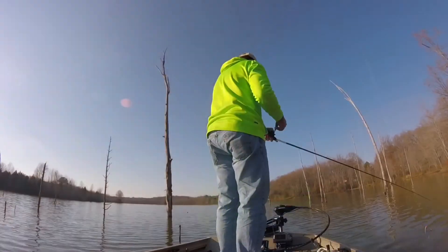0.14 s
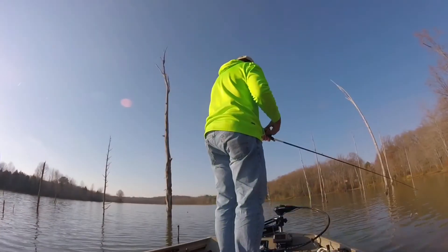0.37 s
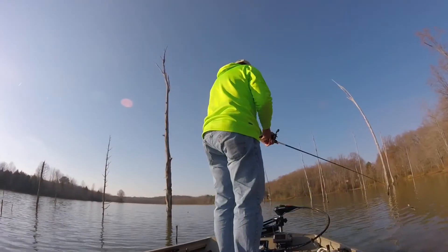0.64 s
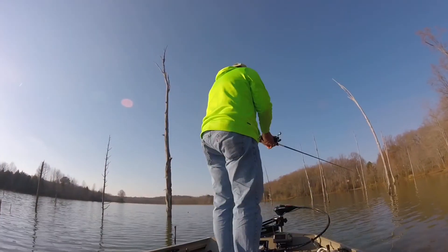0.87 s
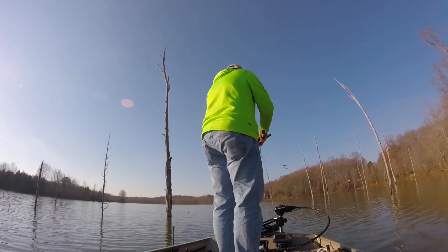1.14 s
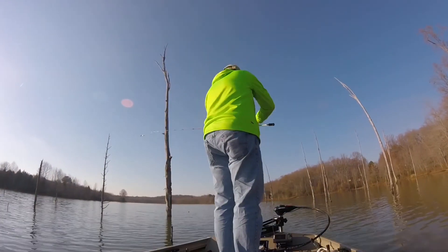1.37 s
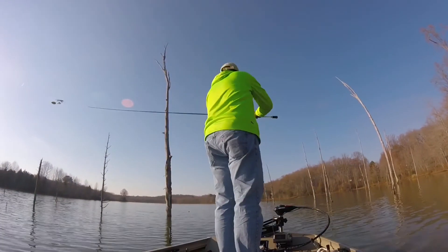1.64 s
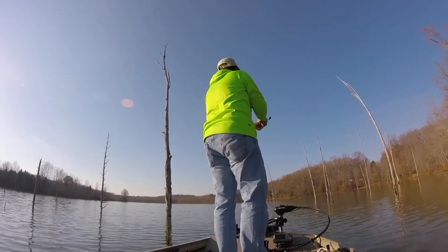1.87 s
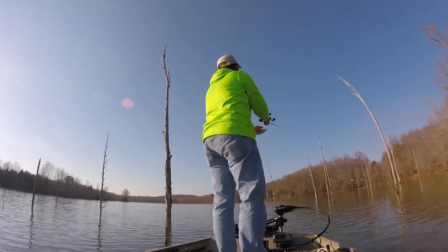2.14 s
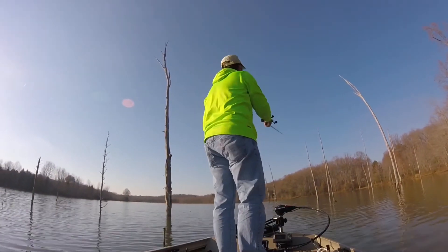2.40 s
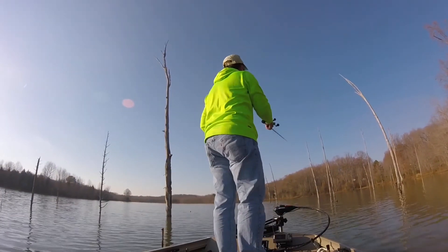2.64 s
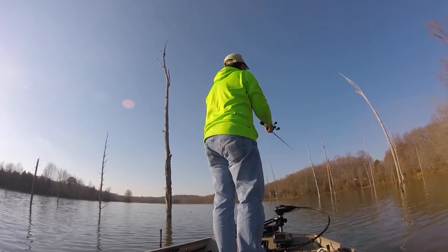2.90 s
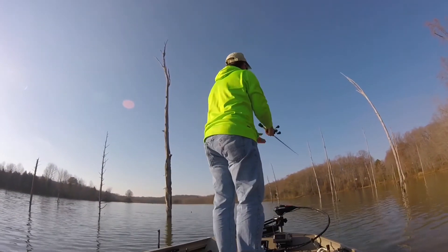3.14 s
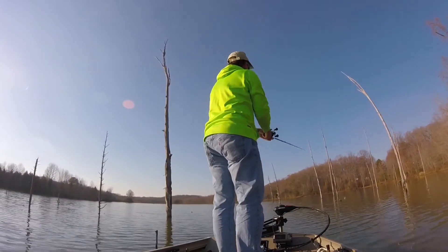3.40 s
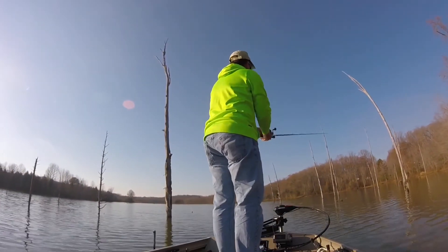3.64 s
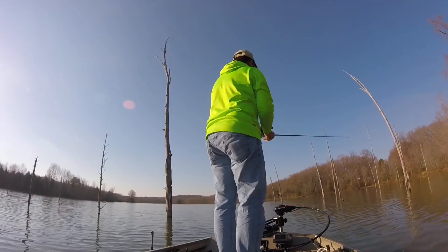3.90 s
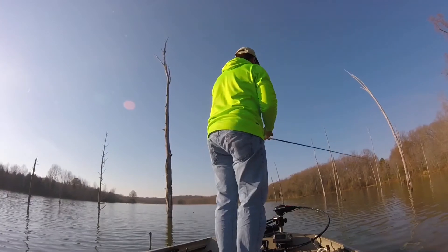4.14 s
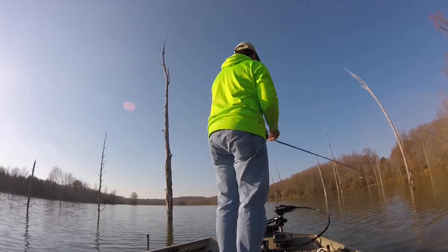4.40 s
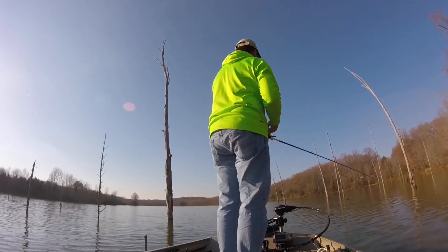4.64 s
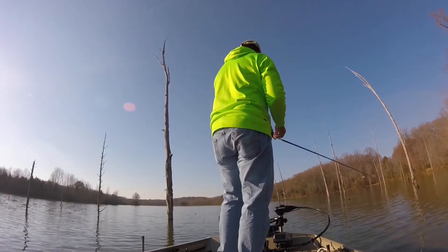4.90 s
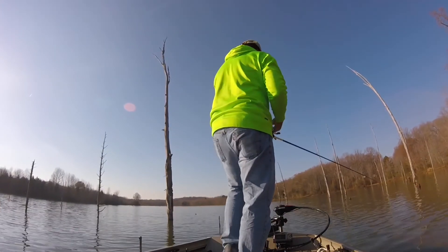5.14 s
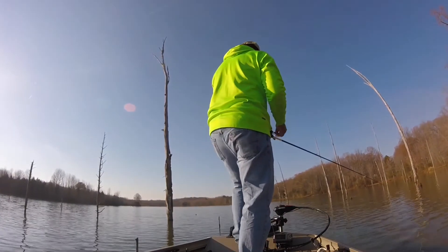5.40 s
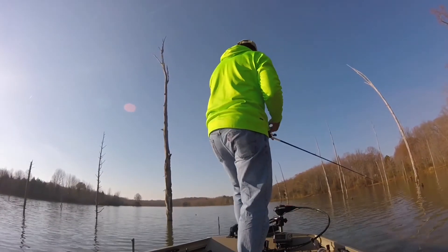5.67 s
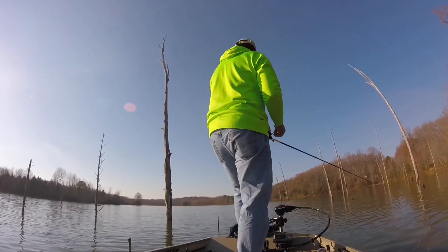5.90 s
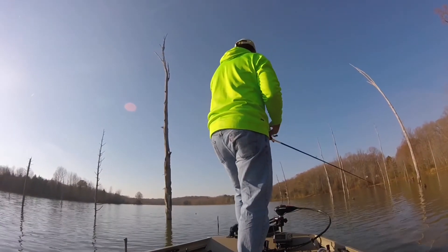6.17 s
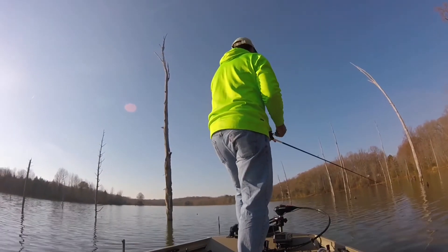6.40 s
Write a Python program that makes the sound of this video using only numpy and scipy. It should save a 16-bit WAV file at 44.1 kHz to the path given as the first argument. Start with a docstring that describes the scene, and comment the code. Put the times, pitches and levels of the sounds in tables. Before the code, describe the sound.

Low wavering engine drone and dull outdoor hush, broken by a loud hollow boat knock, a brief airy cast, tiny metallic tinkles, a sharp reel snap and scuffing feet.

```python
"""A calm lake, heard from a small boat where an angler works a rod: gear and feet knock and scuff on the hull,
the reel clicks, lure hooks jingle and the rod swishes. Rough contacts ring modes of hull, reel and hooks;
the swish is shaped noise. Behind them a far engine of three wavering harmonics changes speed, with thin tones,
low gusts and an early wash over a dull outdoor hush of banded noise."""
import sys
import numpy as np
from scipy import signal
from scipy.io import wavfile
from scipy.ndimage import uniform_filter1d

SR = 44100
rng = np.random.default_rng(int(sys.argv[2]) if len(sys.argv) > 2 else 0)


def file_out(sig):
    """Save sig as 16-bit WAV at sys.argv[1]."""
    # one column per channel
    cols = np.atleast_2d(sig).T
    # limit, then scale
    lim = np.clip(cols, -1, 1)
    pcm = np.round(lim * 32767).astype(np.int16)
    wavfile.write(sys.argv[1], SR, pcm)


def amplitude_ratio(level_db):
    """Convert a level in decibels to the matching linear amplitude (field) ratio."""
    exponent = np.asarray(level_db, float) / 20
    return 10 ** exponent


N = 288185

# modes of the hull ringing free: f/Hz, level/dB, t60/s
HULL_MODES = [(90, 0, .14), (150, 0, .1), (215, 0, .085), (260, -3, .08), (305, 0, .09), (355, -2, .08),
              (409, -1.5, .09), (465, -1.5, .08), (522, 0, .09), (590, -1.5, .08), (646, 0, .1),
              (748, 0, .075), (861, -1.5, .06), (964, -3, .06), (1050, -1.5, .06), (1150, -3, .045),
              (1350, -4, .045), (1800, -8, .025), (2230, -3, .035), (2600, -3, .03), (3000, -3, .025),
              (3400, -3, .025)]
HULL_DAMPING_DB_PER_S = 750   # what strikes the hull rests on it and damps the ring


def rms_one(x):
    """Scale to rms 1."""
    return x / np.sqrt(np.mean(x ** 2) + 1e-20)


def in_time(rows):
    """Table columns after the time as curves, one value a sample."""
    s, *columns = np.transpose(rows)
    return [np.interp(np.arange(N) / SR, s, c) for c in columns]


def swell(s, db, rise_db_per_s, fall_db_per_s, hold_s=0):
    """A level in dB that climbs to its peak at s, holds and sinks."""
    t = np.arange(N) / SR - s
    return db + np.minimum(0, np.minimum(rise_db_per_s * t, fall_db_per_s * (hold_s - t)))


def drift(rate_hz):
    """Slow chance: noise at every 40th sample through a double one-pole low-pass; spread 1."""
    r = np.exp(-80 * np.pi * rate_hz / SR)
    white = rng.standard_normal(N // 40 + 2002)
    slow = signal.lfilter([1], [1, -2 * r, r * r], white)[2000:]
    return np.interp(np.arange(N) / 40, np.arange(len(slow)), rms_one(slow - slow.mean()))


def bandpass(x, low_hz, high_hz):
    """Second-order band-pass design with no ripple."""
    return signal.sosfilt(signal.butter(2, [low_hz, high_hz], "band", fs=SR, output="sos"), x)


def banded_noise(spectrum, patchy_db):
    """Third-octave bands of noise, each with its own level and flicker; rms 1."""
    out, edges = 0, 12 * 2 ** (np.arange(32) / 3)
    white = rng.standard_normal((2, N + SR))      # neighbouring bands get unrelated noise
    hz_points, db_points = np.transpose(spectrum)
    for k, (low, high) in enumerate(zip(edges, edges[1:])):
        band = bandpass(white[k % 2], low, high)[SR:]   # the first second lets the filter settle
        level_db = np.interp(np.log(low * high) / 2, np.log(hz_points), db_points)
        out = out + band * amplitude_ratio(level_db + patchy_db * drift(21.0))
    return rms_one(out)


def tone(hz, level_db):
    """A sine that follows a pitch curve, at an rms level."""
    return np.sqrt(2) * amplitude_ratio(level_db) * np.sin(2 * np.pi * (np.cumsum(hz) / SR + rng.random()))


def ring(clicks, hz, t60):
    """A two-pole resonator: a unit click sets off a dying sine that starts from height 1."""
    r, w = amplitude_ratio(-60 / (max(t60, .002) * SR)), 2 * np.pi * hz / SR
    return signal.lfilter([0, np.sin(w)], [1, -2 * r * np.cos(w), r * r], clicks + 1e-18)


def contact(length_s, first):
    """A first touch, then a chatter of tiny contacts that swells, dies and settles."""
    t = np.arange(SR // 4) / SR / max(length_s, 1e-4)
    chatter = rng.standard_normal(len(t)) * (t * np.exp(-t) + 0.16 * np.exp(-t / 9))
    chatter[0] = first
    return chatter


def blow(touch, hz, t60):
    """One mode rings with the part of the contact near its pitch; peak 1."""
    near = bandpass(touch, hz / 1.5, min(hz * 1.5, .45 * SR))
    rung = ring(near, hz, t60)
    return rung / np.abs(rung).max()


def add(out, sound, s):
    """Mix a short sound in at its time."""
    i = int(s * SR)
    out[i:i + len(sound)] += sound[:N - i]


def damped_t60(t60):
    """Decay rates add: a mode under a resting load dies sooner than a free one."""
    return 1 / (1 / t60 + HULL_DAMPING_DB_PER_S / 60)


def knocks():
    """A knock is a soft-edged thud of the struck spot, then the hull modes near its pitch, the low ones later."""
    # knocks on the hull: t/s, thud peak level/dB, loudest f/Hz, spread/octaves, contact time/s
    knock_rows = [(0.132, -41.5, 1150, 0.4, 0.0014), (0.9885, -30, 930, 0.37, 0.00047),
                  (1.131, -43, 980, 0.28, 0.0028), (1.2813, -17.5, 458, 0.58, 0.00021),
                  (1.283, -27, 297, 0.61, 0.00046), (1.2835, -28, 182, 0.74, 0.00042),
                  (1.284, -35.5, 1110, 0.27, 0.0016), (1.303, -31, 530, 0.61, 0.0015),
                  (1.312, -42, 417, 0.7, 0.0025), (1.33, -46, 382, 0.66, 0.003),
                  (1.679, -43, 965, 0.19, 0.0021), (1.683, -39.5, 712, 0.47, 0.0019),
                  (1.6925, -31.5, 732, 0.18, 0.00095), (1.703, -38, 790, 0.34, 0.0014),
                  (1.713, -39, 702, 0.3, 0.0015), (2.528, -39.5, 850, 1, 0.0022),
                  (3.177, -43, 1068, 0.13, 0.0014), (3.179, -45, 598, 0.32, 0.0011),
                  (3.188, -37.5, 1024, 0.08, 0.0021), (3.215, -49, 980, .15, 0.0028),
                  (3.425, -52, 2550, 0.08, 0.0018), (3.431, -48.5, 2230, 0.08, 0.0013),
                  (3.423, -45, 780, 0.38, 0.0016), (3.4369, -30, 737, 0.5, 0.00027),
                  (3.443, -35, 690, 0.14, 0.00081), (3.451, -47, 238, .25, 0.0029),
                  (3.451, -35.5, 684, 0.083, 0.0013), (3.457, -47, 660, 0.44, 0.00046),
                  (3.7475, -39.5, 820, 0.35, 0.0017), (3.754, -36.5, 735.5, 0.19, 0.0015),
                  (3.761, -43, 697, 0.16, 0.0016), (3.774, -51, 644, 0.5, 0.0016),
                  (4.215, -35, 55.2, 0.7, 0.006), (4.1238, -39, 850, 0.27, 0.0016),
                  (5.691, -34, 880, 0.45, 0.00065), (5.693, -53, 2560, 0.083, 0.0032),
                  (5.69, -32, 69.2, 0.54, 0.0035), (5.707, -39.5, 170, 0.55, 0.0033),
                  (5.73, -40, 139, 0.5, 0.0025), (5.751, -46, 403, 0.44, 0.00085),
                  (5.757, -33, 490, 0.47, 0.00092), (5.957, -40.5, 809, 0.45, 0.0022),
                  (6.043, -55, 2990, 0.43, 0.0027), (6.078, -31.5, 910, 0.051, 0.0052),
                  (6.095, -29.5, 583, 0.33, 0.0006), (6.117, -29, 612, 0.3, 0.0004),
                  (6.128, -36, 599, .2, 0.0022), (6.143, -38, 560, .3, .0015),
                  (6.153, -36.5, 756, 0.18, 0.0026), (6.178, -33, 790, 0.22, 0.0026),
                  (6.222, -39.5, 770, 0.29, 0.0034)]
    sharp_touch_s = 0.0073   # the briefer the contact, the harder its first touch
    thud_cycles, soft_edge_cycles = 9.5, 2.6   # t60 in cycles; a narrow thud dies more slowly
    lag_cycles, hull_ring_db = 0.56, -5.5   # ring level against the thud
    out = np.zeros(N)
    for s, db, top_hz, spread, contact_s in knock_rows:
        touch = contact(contact_s, first=sharp_touch_s / contact_s)
        thud_t60 = thud_cycles / top_hz / np.sqrt(spread)
        thud = ring(blow(touch, top_hz, thud_t60), top_hz, soft_edge_cycles / top_hz)
        add(out, amplitude_ratio(db) * thud / np.abs(thud).max(), s)
        for hz, level_db, t60 in HULL_MODES:
            share_db = -6 * (np.log2(hz / top_hz) / spread) ** 2
            lag_s = lag_cycles * max(1 / hz - 1 / top_hz, 0)
            strength_db = db + hull_ring_db + level_db + share_db
            add(out, amplitude_ratio(strength_db) * blow(touch, hz, damped_t60(t60)), s + lag_s)
    return out


def scuff():
    """Soles and gear drag over the deck: dense uneven grit into the hull modes near where they rub."""
    # rubs on the deck: t/s, relative level/dB, drag/s, loudest f/Hz, spread/octaves
    rubs = [(1.305, -61, 0.019, 430, 0.71), (5.7, -56, 0.02, 435, 1), (5.995, -50.5, 0.086, 760, 0.3),
            (6.08, -49, 0.092, 264, 0.5), (6.16, -55.5, 0.026, 2200, 0.82), (6.095, -48, 0.04, 350, 0.23),
            (6.105, -42, 0.023, 590, 0.093), (6.15, -46, 0.062, 837, 0.23),
            (6.145, -51, 0.047, 1350, 0.088), (5.7, -57, 0.1, 390, 0.49)]
    press_db_per_s, lift_db_per_s = 298, 353
    grit_per_s, scuff_db = 1500, -3   # grains for each mode; overall trim
    pressing = [amplitude_ratio(swell(s, db, press_db_per_s, lift_db_per_s, drag_s)) for s, db, drag_s, _, _ in rubs]
    out = 0
    for hz, level_db, t60 in HULL_MODES:
        grit = (rng.random(N) < grit_per_s / SR) * rng.standard_normal(N)
        reach = 0
        for pressure, (_, _, _, top_hz, spread) in zip(pressing, rubs):
            reach = reach + pressure * amplitude_ratio(-6 * (np.log2(hz / top_hz) / spread) ** 2)
        out = out + ring(grit * reach * amplitude_ratio(level_db), hz, damped_t60(t60))
    soft = signal.butter(2, 1800, fs=SR, output="sos")   # rubber has no sharp edge
    return signal.sosfilt(soft, amplitude_ratio(scuff_db) * out)


def reel():
    """Pawl and bail snaps in a stiff plastic and metal body; the tilt makes one brighter or duller."""
    # modes of the reel body: f/Hz, level/dB, t60/s
    body_modes = [(850, -20, 0.0066), (1220, -8, 0.0034), (1570, -15, 0.0035), (1860, -1, 0.0078),
                  (2380, -9.5, 0.0041), (2850, -4.5, 0.0058), (3330, -8, 0.0095), (3970, -2.5, 0.012),
                  (4560, 1.5, 0.0044), (5700, 0.5, 0.0036), (6330, 6.5, 0.0046), (7230, -16, 0.015),
                  (8040, -9, 0.0034), (9200, -44, 0.019), (10360, -19.5, 0.0036), (12800, -31, 0.0051),
                  (13300, -16, 0.0045)]
    # clicks: t/s, level/dB, tilt/dB per octave, contact time/s, share of the body's colour/0-1
    click_rows = [(0.014, -52, -6, 0.00097, 0.5), (0.133, -53, -6.5, 0.00035, 0.3),
                  (0.9872, -43, 0.5, 0.00089, 0.44), (3.414, -51.5, 0, 0.00036, 0.74),
                  (4.096, -66, 4, 0.00077, 0.91), (4.1175, -53, 3, 0.0005, 0.5),
                  (4.1205, -29, 2.5, 0.00049, 0.94), (4.1255, -44.5, -3, 0.0008, 0.38),
                  (4.1285, -49, -3, 0.0005, 0.7), (4.135, -58, -2, 0.00092, 0.7),
                  (5.962, -60.5, 1, 0.00082, 0.3)]
    out = np.zeros(N)
    for s, db, tilt_db, contact_s, colour in click_rows:
        touch = contact(contact_s, first=0.39)
        for m, (hz, level_db, t60) in enumerate(body_modes):
            strength_db = db + colour * level_db + tilt_db * np.log2(hz / 4000)
            add(out, (-1) ** m * amplitude_ratio(strength_db) * blow(touch, hz, t60), s)   # modes alternate in sign
    return out


def lure():
    """Small steel hooks and rings of the lure tinkle: each touch rings a few high modes."""
    # modes of the hooks: ratio to the lowest, level/dB, t60/s
    hook_modes = [(1, 0, .055), (1.11, -6, .025), (1.455, -10, .06), (1.94, -9, .05), (2.41, -8, .06)]
    # jingles: t/s, level of the lowest mode before scatter/dB, lowest f/Hz, tilt/dB per octave
    jingle_rows = [(1.915, -72, 6030, 7), (1.936, -74, 6030, 10), (1.951, -57, 6030, -3),
                   (1.962, -60, 6030, -3), (1.98, -68, 6030, 4), (2.006, -57, 6050, 1),
                   (2.06, -72, 6080, 5), (2.085, -65, 6060, 7), (2.111, -69, 6090, 8),
                   (2.151, -76, 6140, 12), (2.257, -62, 6120, 3), (2.268, -62, 6120, -8),
                   (2.425, -48, 6207, -17), (2.444, -51, 6207, -17), (2.594, -72, 6250, 11)]
    scatter_db = 2   # no two touches strike the modes alike
    out = np.zeros(N)
    for s, db, hz, tilt_db in jingle_rows:
        touch = contact(0.0012, first=0.31)
        for ratio, level_db, t60 in hook_modes:
            strength_db = db + level_db + tilt_db * np.log2(ratio) + rng.normal(0, scatter_db)
            add(out, amplitude_ratio(strength_db) * blow(touch, hz * ratio, t60), s)
    return out


def swish():
    """Bright air noise of the cast: the rod cuts the air in a flash, the line swells and fades more slowly."""
    # colour of the swish: f/Hz, level/dB per Hz
    air_colour = [(800, 9.5), (1500, -3.5), (3000, -3), (4500, -7), (6500, -1.5), (8000, -14), (11000, -21),
                  (14500, -21), (15500, -30)]
    peak_s = 1.778
    rod = amplitude_ratio(swell(peak_s, -50, rise_db_per_s=390, fall_db_per_s=510))
    line = amplitude_ratio(swell(peak_s, -56.5, rise_db_per_s=140, fall_db_per_s=64))
    return (rod + line) * banded_noise(air_colour, patchy_db=2.2)


def engine():
    """At this distance only the lowest harmonics of the firing rate are left; the air makes them waver."""
    # far engine before its waver: t/s, firing f/Hz, level/dB of harmonics 1, 2 and 3
    speeds = [(0.0, 43.5, -42, -52, -60), (0.18, 42.57, -56, -51.5, -55.5), (0.38, 43.96, -39, -47.5, -62),
              (0.45, 43.4, -64, -39.5, -53.5), (0.63, 41.02, -40.5, -59, -74),
              (0.73, 37.77, -43, -43, -53.5), (0.89, 39.45, -64, -42.5, -64), (1.03, 33.8, -50, -53, -59),
              (1.2, 35, -61, -40, -51), (1.49, 39.2, -46, -49, -64), (1.96, 39.73, -41.5, -48.5, -58),
              (2.35, 36.4, -50, -41.5, -54), (2.51, 32.53, -61, -61, -54), (2.65, 29.97, -42, -58, -72),
              (2.9, 31.36, -62, -57, -61), (3.03, 33.5, -53, -51, -56), (3.14, 33.8, -44, -50.5, -49),
              (3.4, 33.9, -46.5, -50.5, -54), (3.71, 33.78, -54, -46.5, -55), (3.87, 34, -65, -64, -59),
              (4.11, 34.5, -47.5, -43.5, -49.5), (4.47, 42.4, -43, -46, -72),
              (4.84, 44.84, -45.5, -42.5, -59), (5.15, 45.3, -43, -43.5, -72),
              (5.33, 44.2, -43.5, -42.5, -61), (6.33, 45.53, -46, -44, -59), (6.37, 45.1, -55, -42.5, -52),
              (6.53, 45.4, -38, -46, -69)]
    waver_db, waver_hz = 0.5, 4.2
    firing_hz, *levels_db = in_time(speeds)
    firing_hz = firing_hz * (1 + .003 * drift(4))
    return sum(tone(k * firing_hz, db + waver_db * drift(waver_hz)) for k, db in enumerate(levels_db, 1))


def thin_tones():
    """Faint near-sines over the hush: far tones that swell and fade, and whines with a slow waver."""
    # far tones: full from t/s, f/Hz, peak level/dB, rise/dB per s, fall/dB per s, hold/s
    far_rows = [(.15, 372.7, -61, 38, 51, 0.09), (5.386, 710, -56, 42, 88, .2),
                (5.3, 370, -62.5, 12, 11, 0.72)]
    # whines of electronics: f/Hz, level/dB
    whine_rows = [(5405, -90), (9652, -93), (13507, -99)]
    out = 0
    for s, hz, db, rise, fall, hold_s in far_rows:
        pitch_hz = hz * (1 + 0.0049 * drift(12.2))
        out = out + tone(pitch_hz, swell(s, db, rise, fall, hold_s) + 1.6 * drift(9))
    for hz, db in whine_rows:
        out = out + tone(np.full(N, hz), db + 1.4 * drift(1.2))
    return out


def gusts():
    """Lumpy low rumble of air on the microphone: pressure lumps below the engine note."""
    # rumble: t/s, level/dB
    gust_rows = [(0.0, -43), (1.85, -51), (2.44, -42), (2.6, -63), (2.95, -44.5), (3.36, -58),
                 (4.46, -42.5), (4.64, -45.5), (5.22, -46), (5.26, -36), (5.62, -64), (5.76, -45),
                 (5.84, -69), (6.04, -39), (6.13, -53), (6.24, -37), (6.42, -49), (6.53, -56)]
    lows = bandpass(rng.standard_normal(N + SR), 9, 26)[SR:]
    evened = lows / np.sqrt(uniform_filter1d(lows ** 2, size=SR // 6) + 1e-12)   # the lumps come steadily
    return amplitude_ratio(in_time(gust_rows)[0]) * evened


def wash():
    """A soft rushing in the middle range that dies away early."""
    # colour of the wash: f/Hz, level/dB per Hz
    rush_colour = [(300, -35), (550, -7), (800, 8.5), (1100, -14.5), (1700, -16.5), (3000, -22.5),
                   (5000, -49), (9000, -47)]
    level_db = swell(0, -59.5, rise_db_per_s=100, fall_db_per_s=9.5, hold_s=0.56)
    return amplitude_ratio(level_db) * banded_noise(rush_colour, patchy_db=3.0)


def hush():
    """Dull outdoor air, as banded noise; its bass comes and goes."""
    # colour of the hush: f/Hz, level/dB per Hz
    air_colour = [(8.8, -29), (15, -1), (43, -3.5), (68, -2.5), (93, -8), (125, -13), (153, -13.5),
                  (211, -18.5), (399, -20), (518, -22.5), (927, -23), (1660, -37.5), (3420, -40),
                  (9460, -52.5), (11900, -57), (15500, -89)]
    # sway of its bass, before a slow drift: t/s, level/dB
    bass_sway = [(0, 3), (.7, 1), (1.3, 0), (2.2, -3), (2.7, -2.5), (3.3, -1), (3.9, 1.5), (4.25, -4),
                 (4.7, 1.5), (5.3, -2), (5.75, 1.5), (6.1, 0.5), (6.53, 0.5)]
    air = amplitude_ratio(-45) * banded_noise(air_colour, patchy_db=1.03)
    bass = signal.sosfiltfilt(signal.butter(2, 124, fs=SR, output="sos"), air)   # corner in Hz
    bass_gain = amplitude_ratio(in_time(bass_sway)[0] + 0.89 * drift(2.3))
    return air + bass * (bass_gain - 1)


def scene():
    """Everything reaches one microphone in the open air."""
    boat = knocks() + scuff() + reel() + lure() + swish()
    return (hush() + wash() + engine() + thin_tones() + gusts() + boat)[None]


def top_cut(x):
    """Nothing passes above the cut-off."""
    return signal.sosfilt(signal.butter(12, 15710, fs=SR, output="sos"), x)


def record(dry):
    """The finished mix is stored at the level it arrives."""
    return top_cut(dry)


dry = scene()
out = record(dry)
file_out(out)
```